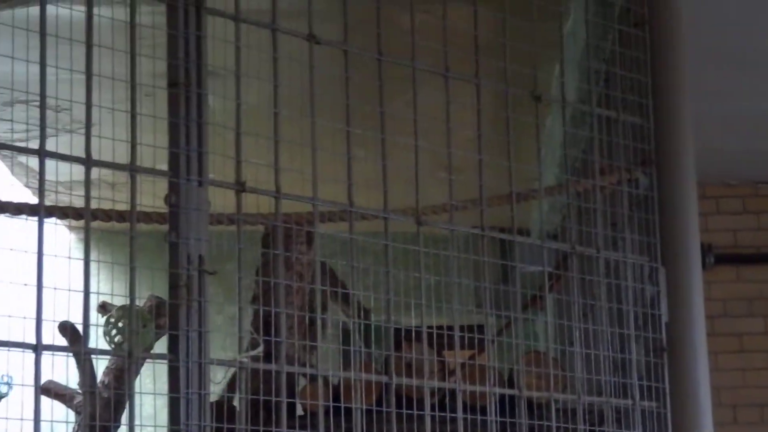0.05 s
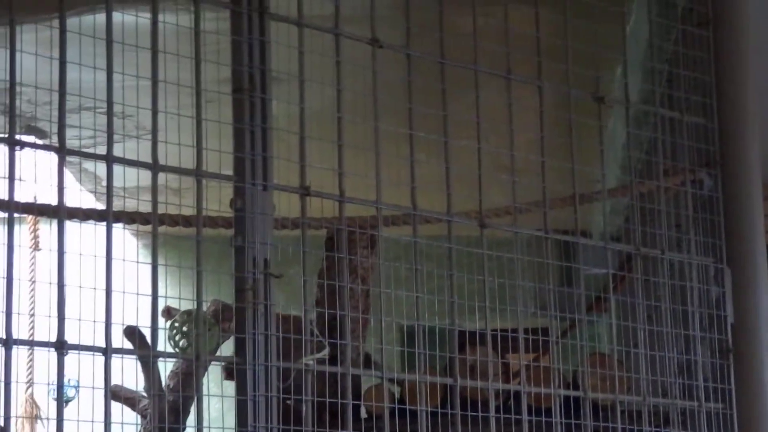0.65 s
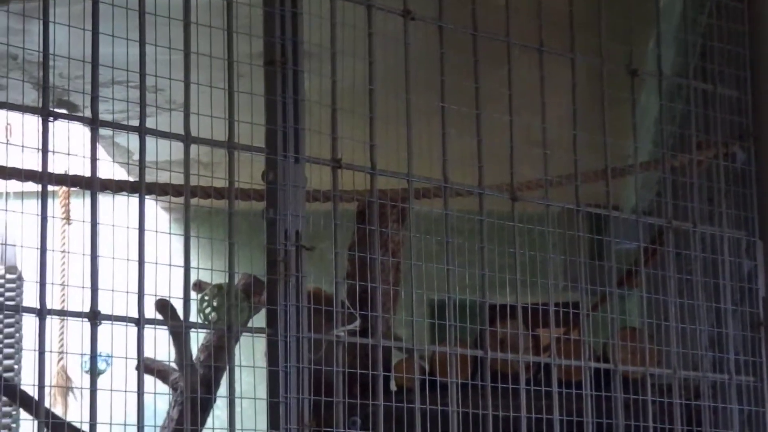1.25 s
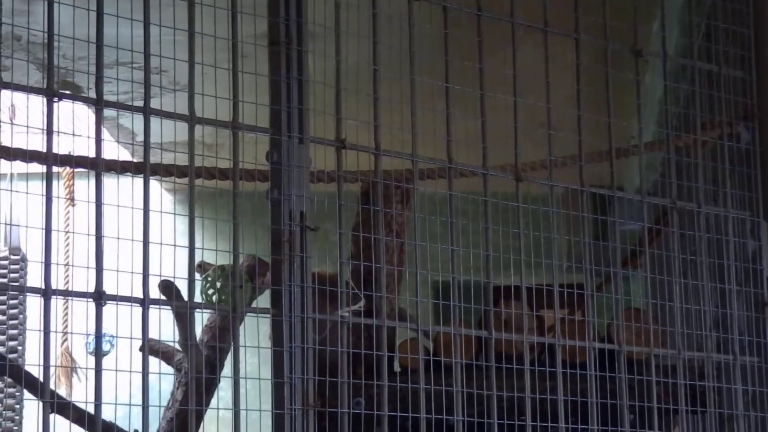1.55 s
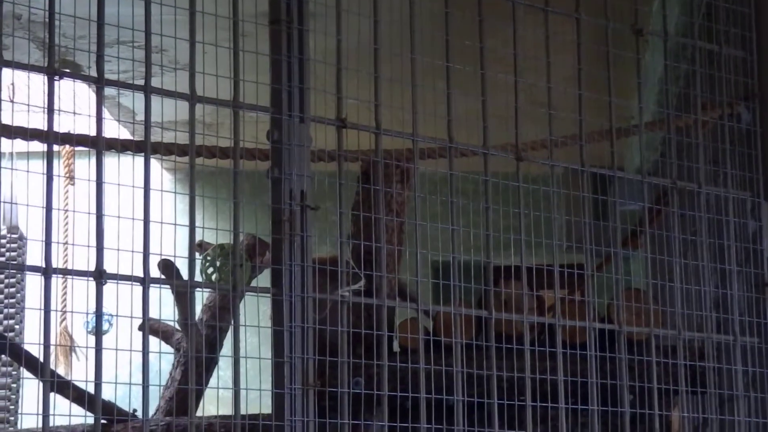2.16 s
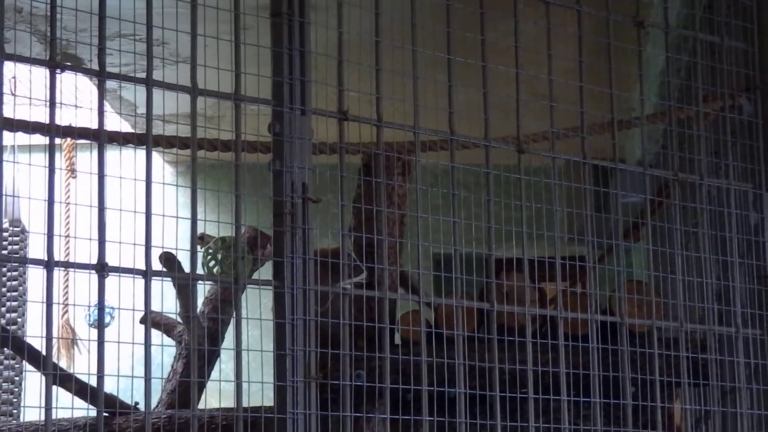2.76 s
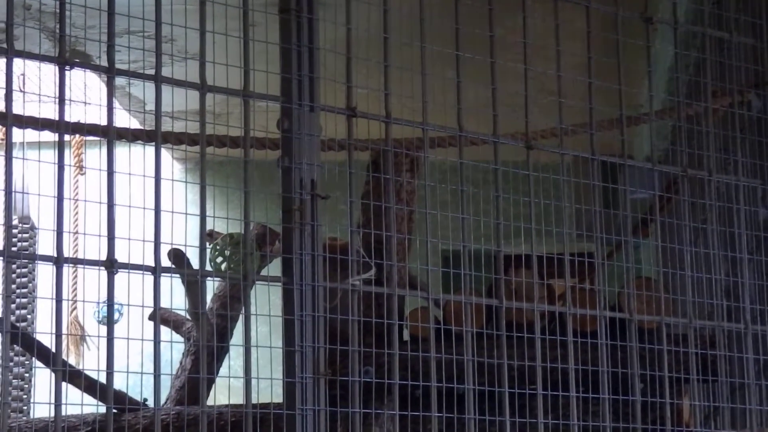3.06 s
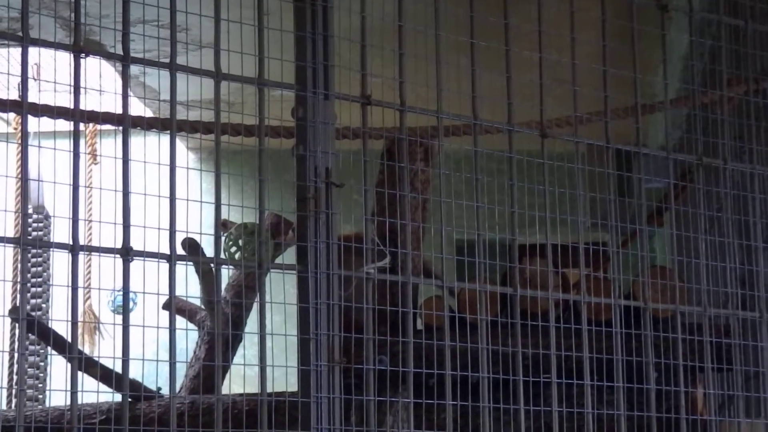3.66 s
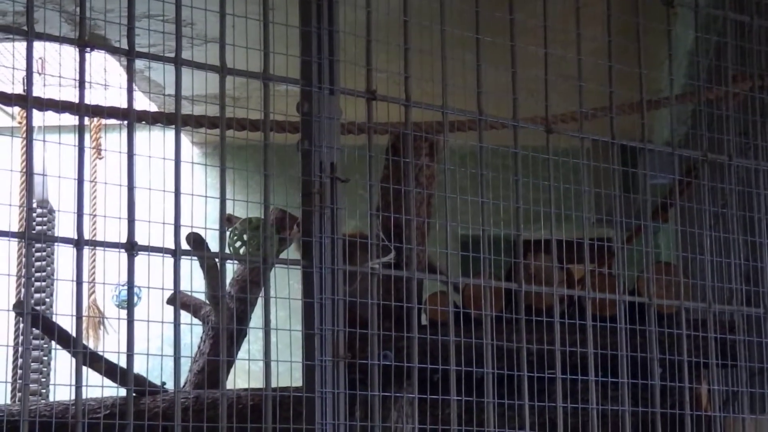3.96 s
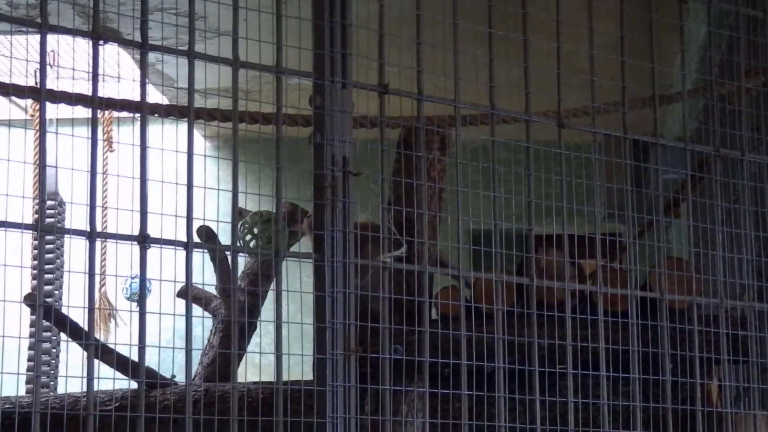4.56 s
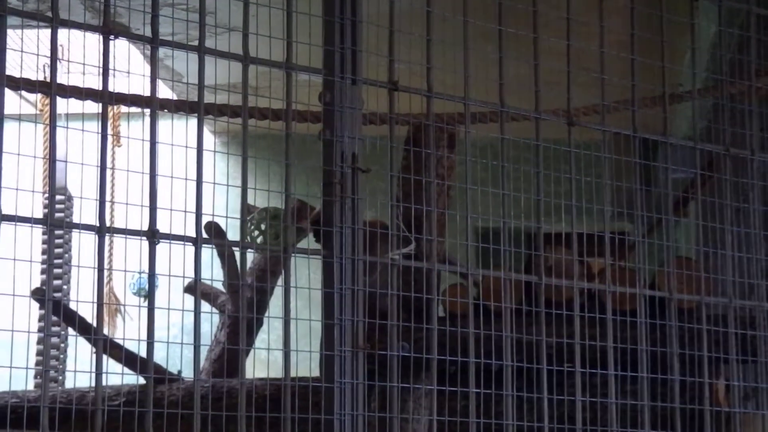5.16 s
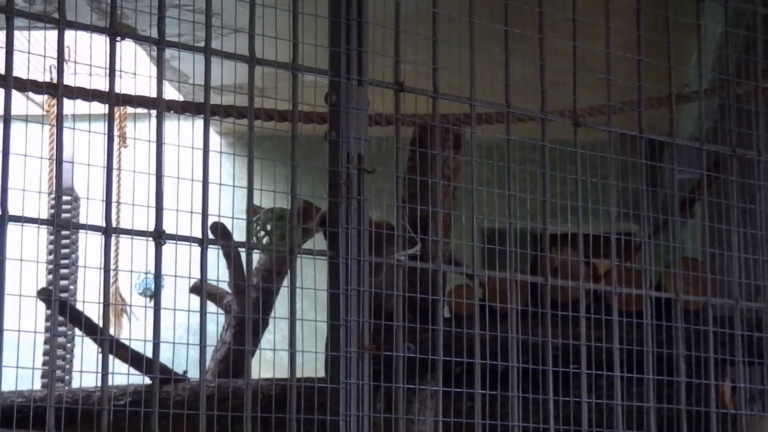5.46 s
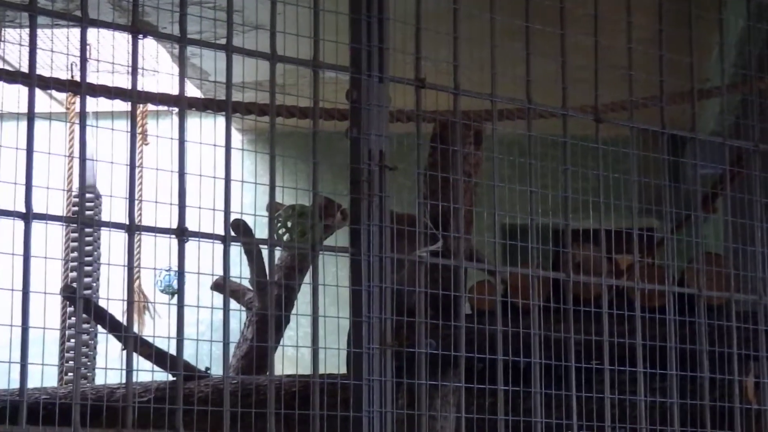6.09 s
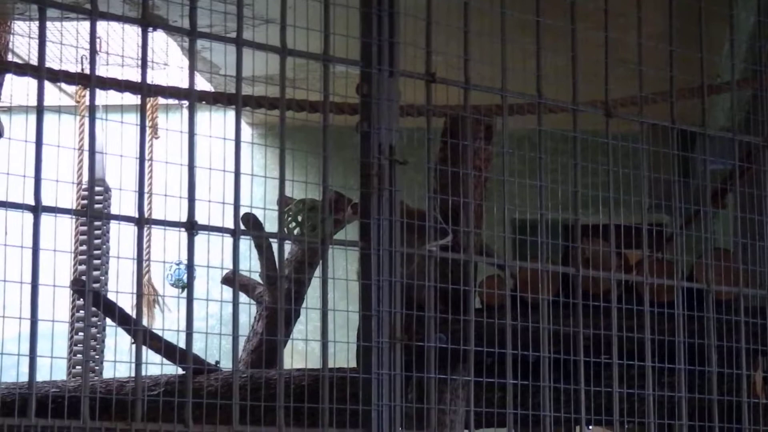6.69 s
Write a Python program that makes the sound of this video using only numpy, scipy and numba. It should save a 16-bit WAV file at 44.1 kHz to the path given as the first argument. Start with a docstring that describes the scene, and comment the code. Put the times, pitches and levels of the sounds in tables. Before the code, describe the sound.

A gibbon gives loud rising whoops and short hoots that echo through an indoor enclosure over a steady ventilation hum.

```python
"""A gibbon whoops in a hard-walled indoor enclosure, with soft low hoots between the whoops.
Its vocal folds give nearly pure rising notes, whose weak overtones are coloured by throat and mouth.
The hall reverberates for about two seconds, and its ventilation rushes and hums.
Automatic gain control ducks at every whoop and lets the hum swell back.
The first whoop is just ending as the scene opens."""
import sys
import numpy as np
from scipy import signal
from scipy.fft import rfft, irfft, next_fast_len
from scipy.io import wavfile
from scipy.ndimage import uniform_filter1d, map_coordinates
from numba import njit

SR = 44100
rng = np.random.default_rng(int(sys.argv[2]) if len(sys.argv) > 2 else 0)


def wrap_up_sound(samples):
    """Save the sound to the file named by the first command line argument, as 16-bit audio."""
    columns = np.atleast_2d(samples).T
    # keep every value between -1 and 1, then stretch to whole-number steps
    tamed = np.clip(columns, -1, 1)
    steps = np.round(tamed * 32767).astype(np.int16)
    wavfile.write(sys.argv[1], SR, steps)


N = 305613
LEAD = SR // 2  # samples before time zero, so that the hall already rings
SPAN = N + LEAD
TIME = (np.arange(SPAN) - LEAD) / SR


def amp(db):
    """Amplitude ratio: a factor of ten for every 20 dB."""
    return 10 ** (np.asarray(db) / 20)


def unit(x):
    """Normalisation to an rms of 1."""
    return x / np.sqrt(np.mean(x ** 2) + 1e-20)


def along(points, hz):
    """Interpolation of (frequency, value) points on a logarithmic frequency axis."""
    knots_hz, values = np.transpose(points)
    return np.interp(np.log(hz + 1), np.log(knots_hz + 1), values)


def wobble(rate, size=SPAN):
    """Random modulation: a spline through `rate` Gaussian knots a second."""
    knots = rng.standard_normal(int(size * rate / SR) + 4)
    return map_coordinates(knots, [np.arange(size) * rate / SR])


def filtered(x, response):
    """Linear filtering: the spectrum is multiplied by a frequency response."""
    size = x.shape[-1]
    padded = next_fast_len(size + 8192)
    return irfft(rfft(x, padded) * response(np.fft.rfftfreq(padded, 1 / SR)), padded)[..., :size]


# Left-right coherence of the diffuse field: frequency_hz, correlation
COHERENCE = [(100, 0.9), (700, 0.92), (1500, 0.53), (2800, 0.094), (5000, 0)]
def diffuse_noise(size):
    """Spatial coherence: sound from all sides is alike at two close points only at long wavelengths."""
    def mid_side_gains(hz):
        angle = np.arccos(np.clip(along(COHERENCE, hz), -1, 1)) / 2
        return np.array([np.cos(angle), np.sin(angle)])
    mid, side = filtered(rng.standard_normal((2, size)), mid_side_gains)
    return np.array([mid + side, mid - side])


# Spectral shape of the rushing air: frequency_hz, relative_density_db
AIR_SPECTRUM = [(22, -10.5), (48, -1.5), (85, -5), (110, 1), (150, -3.5), (450, -6), (950, -18),
                (1400, -20), (2600, -27.5), (3300, -38), (7000, -40), (9500, -57), (15500, -59.5)]
def air_rush(level_db=-21.5):
    """Flow noise: the ventilation's moving air makes a broad spectrum, strongest in the bass."""
    return amp(level_db) * unit(filtered(diffuse_noise(SPAN), lambda hz: amp(along(AIR_SPECTRUM, hz))))


# Tones of the ventilation fans: frequency_hz, level_db
FAN_TONES = [(70, -24.5), (118.6, -23.5), (165, -34), (214.5, -27.5), (247.4, -30), (425.5, -33)]
def fan_hum(drift_rad=0.97, flutter_db=3):
    """Tonal fan noise: spectral lines broadened by random amplitude and phase modulation."""
    hum = np.zeros(SPAN)
    for hz, level_db in FAN_TONES:
        strength = amp(level_db + flutter_db * wobble(rate=17))
        hum += strength * np.sin(2 * np.pi * hz * TIME + drift_rad * wobble(rate=14))
    return hum


@njit
def feedback_gain_db(peak_db, target_db, ceiling_db, step_db, attack_per_s, release_db_per_s):
    """Negative feedback: gain sinks above the target, steps down at the ceiling, else creeps back up."""
    history_db = np.empty(len(peak_db))
    gain_db = 0.
    for i in range(len(peak_db)):
        level_db = peak_db[i] + gain_db
        excess_db = max(level_db - target_db, 0.)
        gain_db = min(gain_db + (release_db_per_s - attack_per_s * excess_db) / SR, 0.)
        if level_db > ceiling_db:
            gain_db -= step_db
        history_db[i] = gain_db
    return history_db


def gain_control(x, abrupt_share=0.52):
    """Compression: the louder channel sets the gain of both; the abrupt share of each step ticks."""
    peak_db = 20 * np.log10(np.abs(x).max(axis=0) + 1e-9)
    gain_db = feedback_gain_db(peak_db, target_db=-6.5, ceiling_db=-1.53, step_db=0.88,
                               attack_per_s=49.0, release_db_per_s=13.0)
    smooth_db = uniform_filter1d(gain_db, size=64)
    return x * amp(smooth_db + abrupt_share * (gain_db - smooth_db))


# Reverberation time of the hall: frequency_hz, t60_s
REVERB_TIMES = [(250, 5.33), (700, 1.65), (1700, 1.45), (4000, 1.05), (8000, 0.07)]
def hall(x, direct_db=-9, early_db=-4, early_t60_s=0.29, tail_db=-2.5, build_up_s=0.0044):
    """Reverberation: convolution with the direct path, near-wall reflections and a long diffuse tail."""
    def decay_norm(t60_s):  # root energy of an exponential decay
        return np.sqrt(SR * t60_s / np.log(10 ** 6))
    t = np.arange(2 * SR) / SR
    hz, frame_s, spectra = signal.stft(diffuse_noise(len(t)), SR, nperseg=256)
    decay = amp(-60 * frame_s / along(REVERB_TIMES, hz)[:, None])
    tail = signal.istft(spectra * decay, SR, nperseg=256)[1][:, :len(t)]
    tail *= amp(tail_db) / decay_norm(REVERB_TIMES[1][1])  # normalised near the pitch of the calls
    early = amp(early_db - 60 * t / early_t60_s) * diffuse_noise(len(t)) / decay_norm(early_t60_s)
    response = (tail + early) * np.clip(t / build_up_s, 0, 1)
    response[:, 0] += amp(direct_db)
    return signal.fftconvolve(x[None], response, axes=1)[:, :SPAN]


# Stereo balance of the calls: frequency_hz, left_minus_right_db
BALANCE = [(700, -0.04), (1500, 2.5), (3500, 3), (6000, 10.5), (9000, 6.5)]
def lean_left(x):
    """Level difference between the channels: the overtones lie toward the left."""
    return filtered(x, lambda hz: amp(np.outer([.5, -.5], along(BALANCE, hz))))


def note(start_s, length_s, fade_s=.016):
    """Raised-cosine gating: a note's samples, its own time, and a gate that fades outside its length."""
    at = np.flatnonzero((TIME > start_s - fade_s) & (TIME < start_s + length_s + fade_s))
    t = TIME[at] - start_s
    ramp = np.clip(np.minimum(t, length_s - t) / fade_s + 1, 0, 1)
    return at, t, np.sin(np.pi / 2 * ramp) ** 2


def glide(t, takes_s):
    """Sigmoid transition from 0 to 1, halfway at t = 0."""
    return (1 + np.tanh(2 * t / takes_s)) / 2


# Hoots, alone or joined to a whoop:
# start_s, length_s, low_hz, closing_hz, relative_level_db, octave_boost_db, press_db
HOOTS = [ (0.384, .125, 549.9, 688, 2.5, -0.5, -9.5), (1.017, .08, 559.2, 724, 9, 1.5, -6.5),
         (2.614, 0.086, 528, 637, -2, 7, -0.5), (3.619, .15, 520, 679.6, -4.5, 3.5, -0.5),
         (4.518, .13, 698.9, 811, 10, 3, -1), (4.662, .13, 565, 719.5, 2.5, 1.5, -3),
         (6.166, 0.14, 538, 734, 3.5, 2.5, -7.5), ]
def hoot(start_s, length_s, low_hz, closing_hz, level_db, octave_db, press_db, swell_db=9.5):
    """Power-law glide: the pitch scoops upward while the level swells and fades."""
    at, t, gate = note(start_s, length_s)
    progress = np.clip(t / length_s, 0, 1)
    hz = low_hz + (closing_hz - low_hz) * progress ** 1.9
    envelope = gate * amp(level_db - swell_db * (2 * progress - 1) ** 2)
    return at, hz, envelope, amp(octave_db), amp(press_db)


# Whoops: start_s, length_s, leap_after_s, leap_takes_s, slide_after_s, slide_takes_s, low_hz, top_hz,
# closing_hz, relative_opening_db, relative_top_db, octave_boost_db, press_db
WHOOPS = [ (-.42, 0.47, 0.12, .11, .38, .12, 674.6, 911, 757.6, 14.5, 9, 3, -1),
          (1.166, .447, .047, .105, .302, .135, 630, 966.9, 685.5, 9.5, 12, -0.5, 2),
          (2.742, .40, 0.062, .08, .262, 0.043, 560.2, 825.4, 761.9, 6.5, 10.5, 2, 3),
          (4.265, .265, 0.091, .048, 0.2, .04, 612, 819.4, 700.3, 6, 10, -1.5, 1),
          (5.638, 0.3, .093, 0.092, .22, 0.037, 604.3, 916.7, 870.5, 8, 15, 2, 0),
          (6.605, 0.38, 0.061, 0.058, 0.35, .04, 571.7, 722, 780, 5.5, 14, 0.5, -2.5), ]
def whoop(start_s, length_s, leap_after_s, leap_takes_s, slide_after_s, slide_takes_s,
          low_hz, top_hz, closing_hz, opening_db, top_db, octave_db, press_db,
          opening_octave_db=-0.5, opening_press_db=-7, slide_db_per_hz=0.0151):
    """Vocal effort: one leap moves pitch, level and brightness together; a pitch slide ends the note."""
    at, t, gate = note(start_s, length_s)
    effort = glide(t - leap_after_s, leap_takes_s)
    slide_hz = (closing_hz - top_hz) * glide(t - slide_after_s, slide_takes_s)
    hz = low_hz + (top_hz - low_hz) * effort + slide_hz
    envelope = gate * amp(opening_db + (top_db - opening_db) * effort + slide_db_per_hz * slide_hz)
    octave = amp(octave_db + opening_octave_db * (1 - effort))
    press = amp(opening_press_db + (press_db - opening_press_db) * effort)
    return at, hz, envelope, octave, press


# Filtering of overtones and rasp by throat and mouth: frequency_hz, gain_db
VOCAL_TRACT = [(1100, -30), (1270, -29.5), (1480, -30.5), (1680, -18), (1850, -19.5), (2000, -21.5),
               (2180, -33.5), (2800, -31.5), (3200, -45.5), (3880, -28), (4600, -34.5), (6200, -37),
               (7500, -41), (8600, -57.5), (10000, -75)]
def gibbon(jitter=.005, wander=.008, flicker_db=4, smear_rad=0.051, hoarse_smear_rad=0.36,
           upper_db=-15, third_db=5, rasp_db=-50, hoarse_rasp_db=8, rasp_hz=3500, hoarse_range_hz=110):
    """Source-filter voice: a strong fundamental, with weak overtones and rasp shaped by the tract."""
    voice = np.zeros(SPAN)
    noise = rng.standard_normal(SPAN)
    rasp = unit(filtered(noise, lambda hz: amp(along(VOCAL_TRACT, hz)) * np.minimum(hz / rasp_hz, 1) ** 2))
    waver = 1 + jitter * wobble(rate=70) + wander * wobble(rate=18)
    calls = [whoop(*row) for row in WHOOPS] + [hoot(*row) for row in HOOTS]
    for at, hz, envelope, octave, press in calls:
        phase = 2 * np.pi * np.cumsum(hz * waver[at]) / SR
        # each note is hoarse until it has climbed to its highest pitch
        hoarse = np.clip((hz.max() - np.maximum.accumulate(hz)) / hoarse_range_hz, 0, 1)
        tone = np.sin(phase)
        for k in range(2, 13):
            # the higher the overtone, the more an uneven cycle blurs it
            blur = k * (smear_rad + hoarse_smear_rad * hoarse) * wobble(rate=130, size=len(at))
            tract = amp(along(VOCAL_TRACT, k * hz) + flicker_db * wobble(rate=25.38, size=len(at)))
            # above the octave, overtones grow as the folds are pressed together, the third most
            source = octave if k == 2 else press * amp(upper_db + third_db * (k == 3))
            tone += tract * source * np.sin(k * phase + blur)
        rasp_gain = press * amp(rasp_db + hoarse_rasp_db * hoarse)
        voice[at] += envelope * (np.sqrt(2) * tone + rasp_gain * rasp[at])
    return voice


def scene():
    """Superposition: the reverberant calls and the ventilation pass through one gain control."""
    calls = lean_left(hall(gibbon()))
    return gain_control(calls + air_rush() + fan_hum())[:, LEAD:]


def record(dry):
    """Band limiting: an ideal low-pass filter at 15.8 kHz."""
    return filtered(dry, lambda hz: hz < 15800)


dry = scene()
out = record(dry)
wrap_up_sound(out)
```